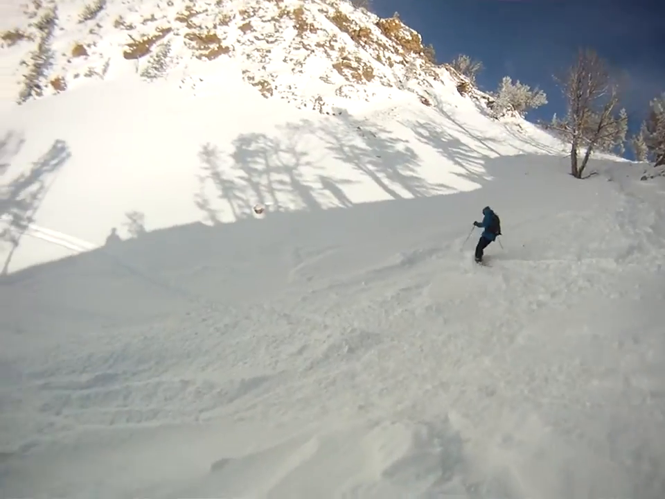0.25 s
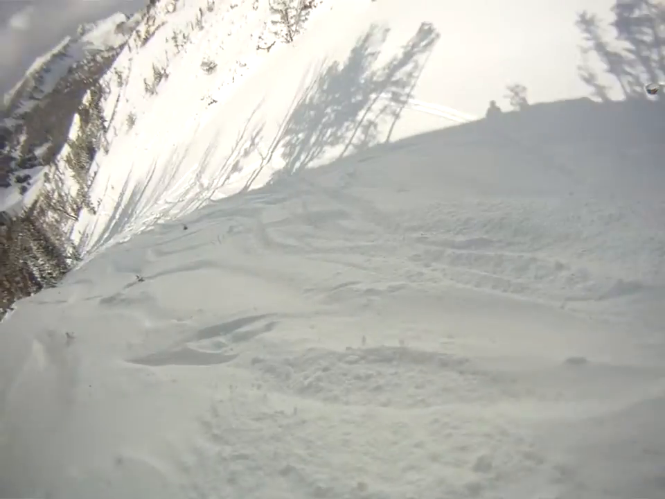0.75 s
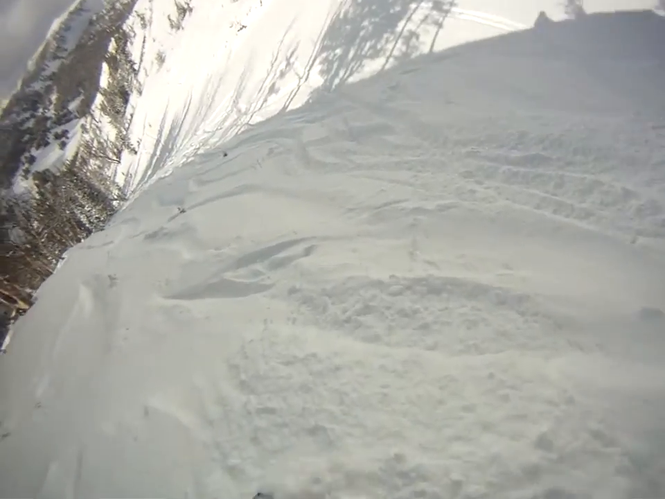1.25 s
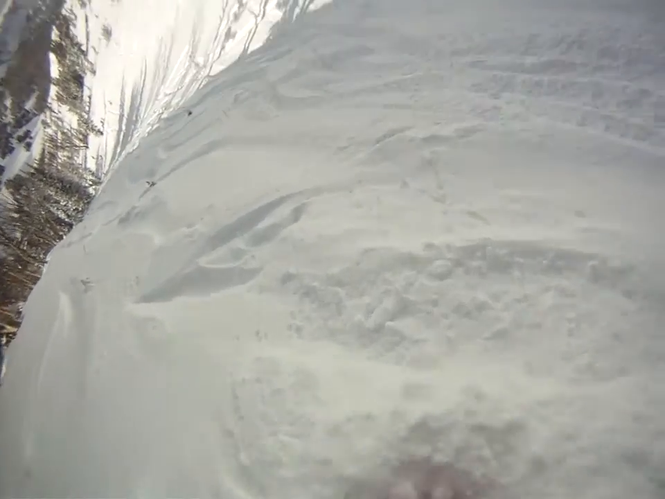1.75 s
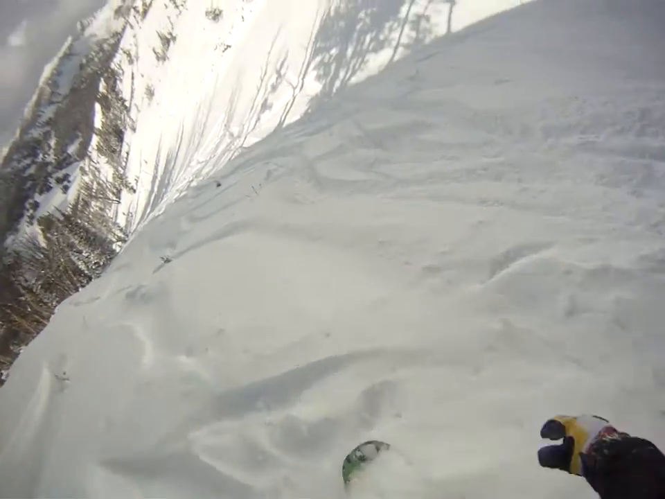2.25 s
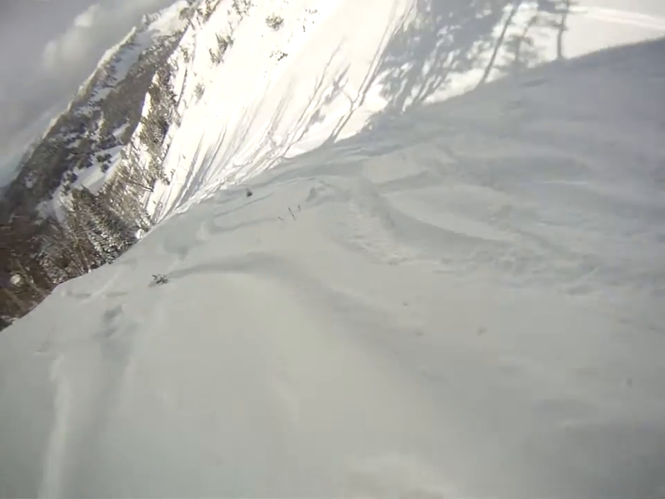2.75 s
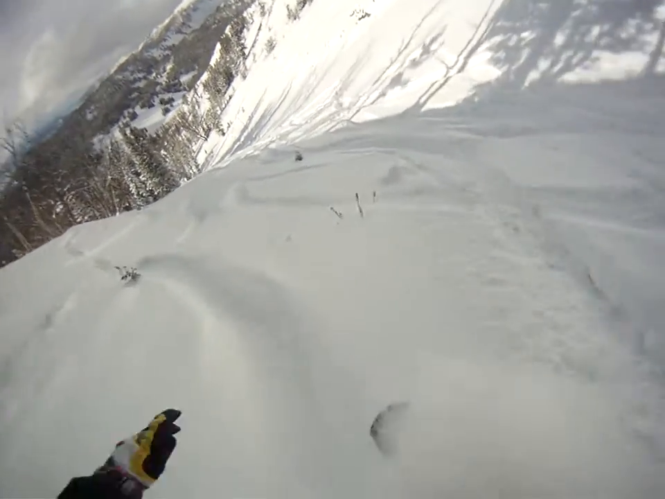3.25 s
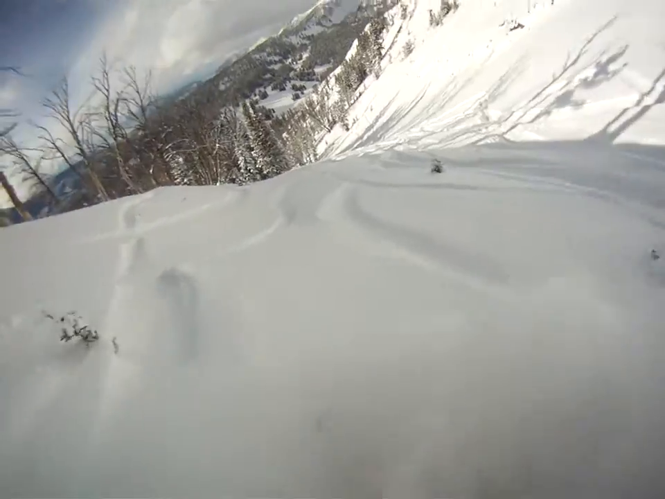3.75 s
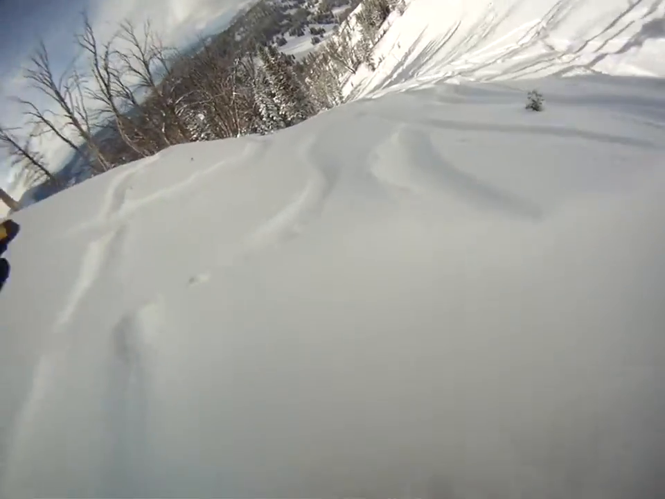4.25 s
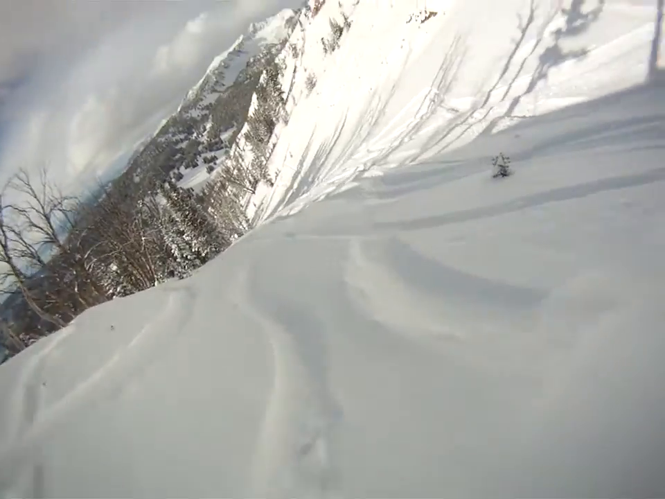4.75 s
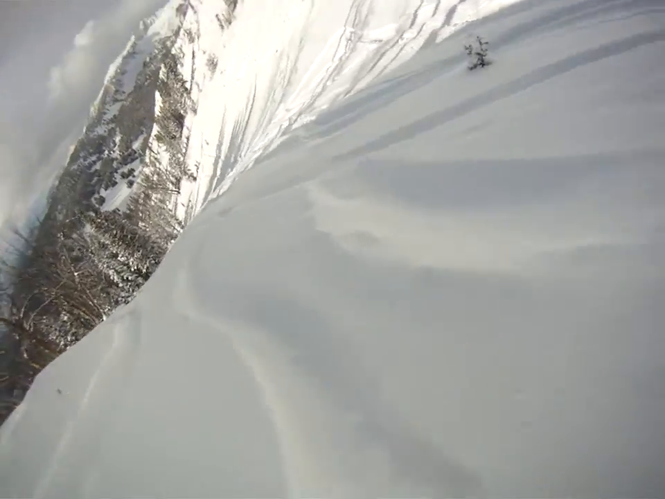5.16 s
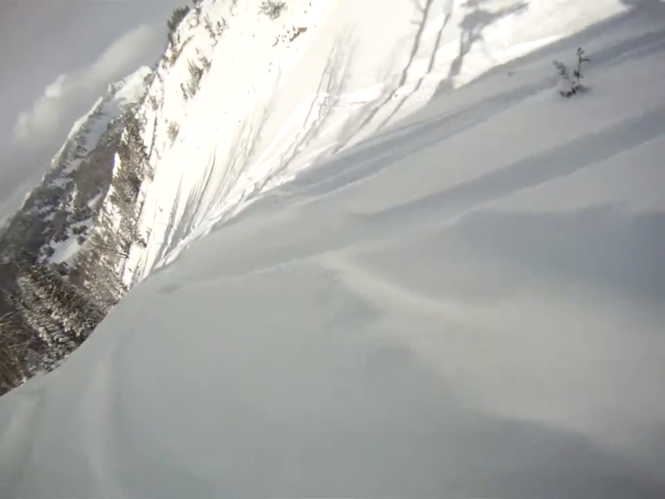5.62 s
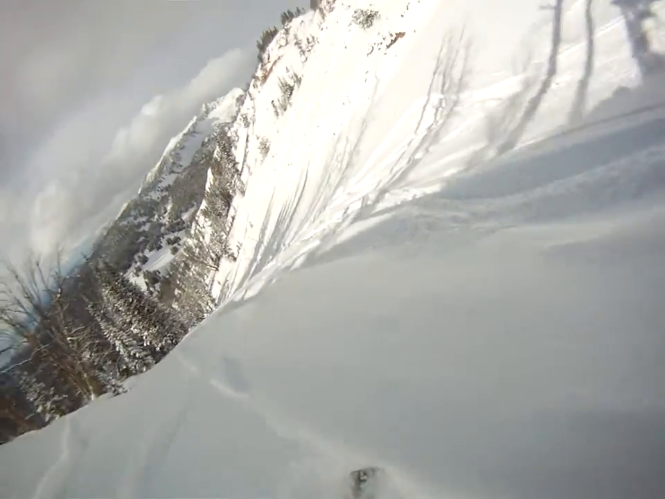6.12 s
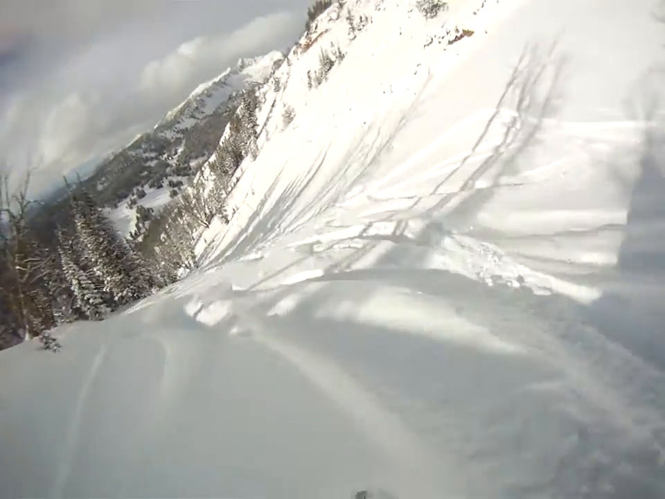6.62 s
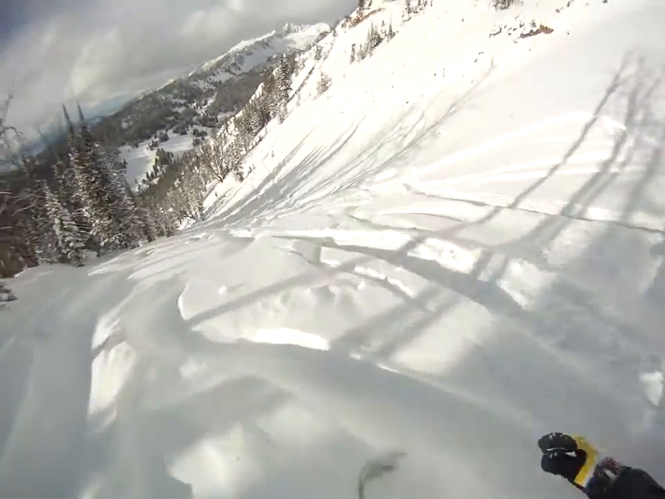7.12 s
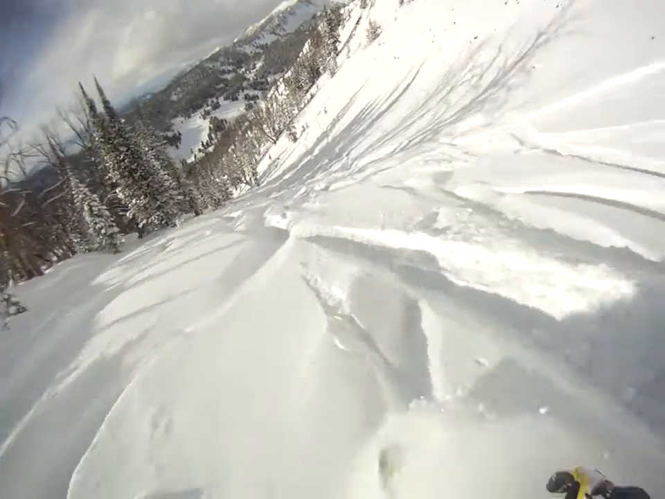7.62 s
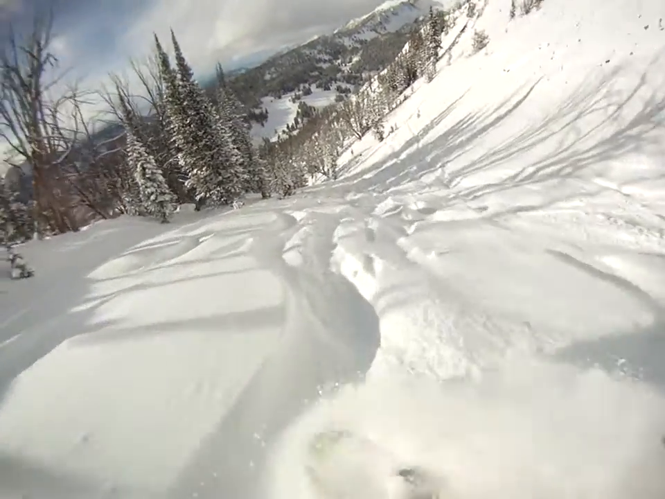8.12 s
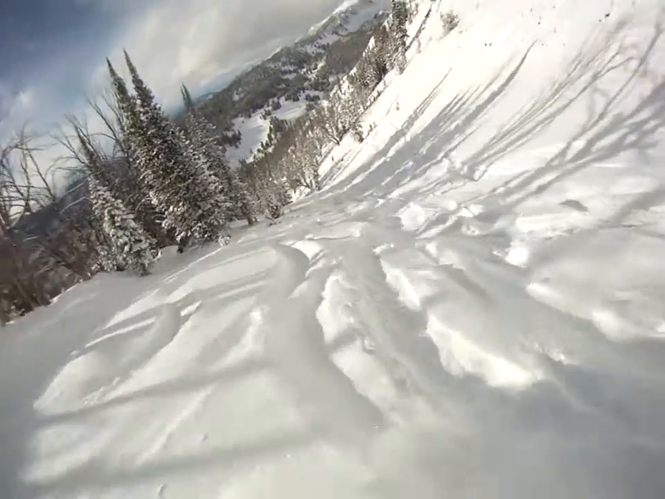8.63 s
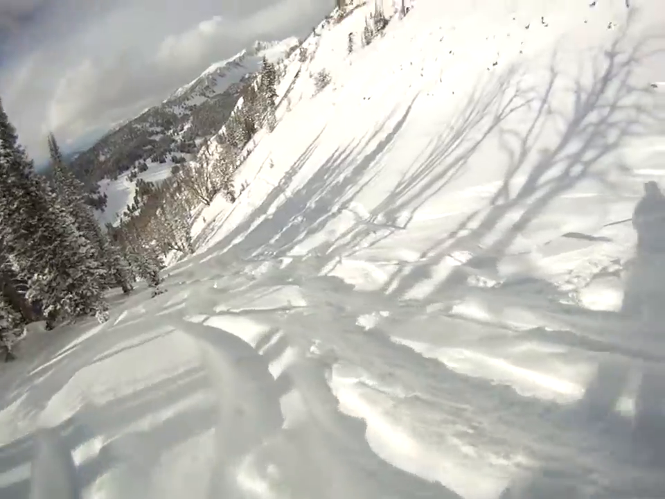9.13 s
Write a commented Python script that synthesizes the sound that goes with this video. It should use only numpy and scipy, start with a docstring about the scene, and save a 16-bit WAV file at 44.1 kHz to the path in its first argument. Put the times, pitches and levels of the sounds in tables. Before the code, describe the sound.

Wind buffets the microphone as a skier carves powder snow, each turn a rushing hiss, amid fabric rustle and small clicks.

```python
"""A low headwind rumbles on a body-worn camera, then the sound of skiing in deep powder cuts in abruptly.
The skis push up a rushing hiss that swells with each turn and once scrape over something firm.
Stiff clothing rustles, gear rattles and ticks, bumps shake the camera and snow clumps pat on its case.
The camera samples at a low rate, which mirrors the sound into a thin, fizzy treble."""
import sys
import numpy as np
from scipy import signal
from scipy.fft import rfft, irfft, next_fast_len
from scipy.io import wavfile
from scipy.ndimage import uniform_filter1d, map_coordinates

SR = 44100
rng = np.random.default_rng(int(sys.argv[2]) if len(sys.argv) > 2 else 0)


def master_out(mix):
    """Clip the mix to full scale and print it as 16-bit PCM to the path in sys.argv[1]."""
    frames = np.transpose(np.atleast_2d(mix))
    ceiling = np.clip(frames, -1, 1)
    pcm = np.round(ceiling * 32767).astype(np.int16)
    wavfile.write(sys.argv[1], SR, pcm)


N = 413658
TIME_S = np.arange(N) / SR


def amp(db):
    """Decibels to gain."""
    return 10 ** (np.asarray(db) / 20)


def unit(x):
    """Scale to rms 1."""
    return x / np.sqrt(np.mean(x ** 2) + 1e-20)


def wobble(rate_hz):
    """Smooth random curve, rate_hz knots a second."""
    knots = rng.standard_normal(int(N * rate_hz / SR) + 4)
    return map_coordinates(knots, [TIME_S * rate_hz])


def shape(points):
    """Gain against frequency from (freq_hz, level_db) points on a log axis."""
    freq_hz, level_db = np.transpose(points)
    return lambda hz: amp(np.interp(np.log(hz + 1), np.log(freq_hz), level_db))


def resonances(modes):
    """Gain against frequency from (centre_hz, width_hz, level_db) modes."""
    return lambda hz: np.sqrt(sum(
        np.abs(amp(db) * hz * width / (centre ** 2 - hz ** 2 + 1j * hz * width)) ** 2
        for centre, width, db in modes))


def coloured(x, gain):
    """Minimum-phase filter with the given gain against frequency."""
    size = 2 * next_fast_len(N // 2 + SR // 4)
    magnitude = np.maximum(gain(np.fft.rfftfreq(size, 1 / SR)), 1e-6)
    cepstrum = irfft(np.log(magnitude), size)
    cepstrum[1:size // 2] *= 2
    cepstrum[size // 2 + 1:] = 0
    return irfft(rfft(x, size) * np.exp(rfft(cepstrum)), size)[:N]


def noise(spectrum):
    """Coloured noise, rms 1."""
    return unit(coloured(rng.standard_normal(N), shape(spectrum)))


def grains(per_s, spread_db):
    """Random impulses, a few much larger than the rest; rms 1."""
    sizes = amp(spread_db * np.minimum(rng.exponential(size=N), 4))
    return unit((rng.random(N) < per_s / SR) * sizes * rng.choice([-1, 1], N))


def strike(t, rise_s, t60_s):
    """Envelope: quick rise, exponential decay."""
    return (1 - np.exp(-t / rise_s)) * amp(-60 * t / t60_s)


def add(track, start_s, sound):
    """Mix a sound into the track."""
    part = track[round(start_s * SR):][:len(sound)]
    part += sound[:len(part)]


def swell_power(rows, column=1, roundness=1.34, drop_db=11):
    """Power of swells, drop_db down at half_length_s from peak_s; column selects the level."""
    power = np.zeros(N)
    for row in rows:
        peak_s, level_db, half_length_s = row[0], row[column], row[2]
        away = np.abs(TIME_S - peak_s) / half_length_s
        near = away < 4
        power[near] += amp(level_db - drop_db * away[near] ** roundness) ** 2
    return power


def cut_in(start_s=0.48, rise_s=0.03):
    """0 before the skiing sound cuts in, 1 after."""
    return np.clip((TIME_S - start_s) / rise_s, 0, 1)


# Speed of the run, as headwind strength: time_s, level_db
HEADWIND = [(0.0, -75.5), (0.68, -63.5), (2.27, -65), (2.3, -60.5), (3.29, -54), (4.75, -61), (5.56, -57),
            (5.64, -55.5), (5.9, -59.5), (6.16, -55), (6.45, -61.5), (7.13, -55), (7.21, -58.5),
            (8.15, -56), (8.8, -61.5), (8.93, -59), (9.3, -61.5), (9.38, -58)]


def speed_power(cruise_db, db_per_db, cruise_headwind_db=-59):
    """Power of a sound that is cruise_db at cruising speed and grows with the headwind."""
    headwind_db = np.interp(TIME_S, *np.transpose(HEADWIND))
    return amp(cruise_db + db_per_db * (headwind_db - cruise_headwind_db)) ** 2


def eddies(spectrum):
    """Low turbulence of even strength."""
    flow = noise(spectrum)
    local_power = np.abs(uniform_filter1d(flow ** 2, size=SR // 7))
    return unit(flow / np.sqrt(local_power + 0.05))


# Wind spectra: freq_hz, density_db
LARGE_EDDY_SPECTRUM = [(4, -24.5), (12, 0.5), (24, -3), (37, -1), (48, -4.5), (60, -17), (100, -49.5)]
SMALL_EDDY_SPECTRUM = [(35, -25), (52, -2.5), (63, 1.5), (80, -5.5), (105, -12.5), (150, -23.5), (400, -65)]
RUSH_SPECTRUM = [(40, -14.5), (90, 2.5), (130, 2.5), (200, -5), (320, -10.5), (600, -21), (1500, -24),
                 (6000, -61)]
AIR_SPECTRUM = [(100, 2), (450, -2), (800, -4.5), (2000, -7), (4500, -11.5), (6000, -12.5)]
# Gusts on the case: peak_s, large_eddy_db, half_length_s, small_eddy_db, rush_db
WIND_GUSTS = [(0.68, -51, 0.089, -50, -65), (1.02, -49, 0.19, -51, -70), (1.38, -46.5, 0.08, -53, -70),
              (1.65, -43.5, 0.07, -55, -69), (2.15, -43, 0.47, -54.5, -75), (2.6, -38, 0.2, -55, -62),
              (2.98, -40, 0.28, -48, -62), (3.6, -37.5, 0.39, -46.5, -60), (4.07, -38, 0.3, -51, -63),
              (4.55, -44, 0.17, -53, -68), (4.96, -44.5, 0.12, -50.5, -64), (5.37, -41, 0.41, -51.5, -66),
              (5.65, -54, 0.12, -54, -54), (6.3, -45.5, 0.2, -63, -64), (7.15, -43.5, 0.21, -48.5, -62),
              (7.7, -39, 0.23, -51, -62), (8.1, -48, 0.064, -50, -58), (8.37, -42, 0.21, -50, -61),
              (9.27, -48, 0.1, -53, -68)]


def wind():
    """Large eddies thump the case, small ones flutter and rush past it, over a faint even hiss."""
    large = np.sqrt(speed_power(cruise_db=-51, db_per_db=0.7) + swell_power(WIND_GUSTS))
    small = np.sqrt(speed_power(cruise_db=-55, db_per_db=0.88) + swell_power(WIND_GUSTS, column=3))
    stream = np.sqrt(speed_power(cruise_db=-61, db_per_db=1.24) + swell_power(WIND_GUSTS, column=4))
    thumps = eddies(LARGE_EDDY_SPECTRUM) * large * amp(2.2 * wobble(9))
    flutter = eddies(SMALL_EDDY_SPECTRUM) * small * amp(1.8 * wobble(14))
    rush = noise(RUSH_SPECTRUM) * stream * amp(1.2 * wobble(20))
    return thumps + flutter + rush + amp(-63) * noise(AIR_SPECTRUM)


# Snow spectra: freq_hz, density_db
HISS_SPECTRUM = [(400, -21), (750, -20.5), (1000, -10.5), (1250, -0.3), (1500, -0.5), (1700, 3),
                 (2000, -5.5), (2400, -0.5), (2800, -5.5), (3300, -6.5), (4300, -20.5), (5100, -14),
                 (6500, -31), (9000, -52.5)]
CRUNCH_SPECTRUM = [(200, -8.5), (450, -9.5), (650, -23), (820, 2), (1000, -9), (1600, -12), (4000, -43)]
# Skis pressing into deeper snow: peak_s, hiss_db, half_length_s, crunch_db, hollow_db
SKI_SURGES = [(0.62, -62, 0.04, -68, -72), (3.1, -46, 0.063, -74, -66), (3.29, -45.5, 0.031, -74, -60),
              (3.425, -42, 0.059, -71, -61), (3.61, -49, 0.15, -64, -60), (3.86, -54, 0.059, -60, -66),
              (4.17, -50.5, 0.072, -75, -53.5), (5.19, -50, 0.028, -80, -66), (6.19, -44, 0.11, -54.5, -68),
              (6.63, -58, 0.11, -77, -74), (6.96, -46, 0.094, -74, -61), (7.26, -52, 0.07, -78, -55),
              (7.66, -44, 0.066, -59.5, -60), (7.96, -49, 0.11, -80, -68), (8.13, -55, 0.062, -80, -54),
              (8.31, -57, 0.08, -78, -51.5)]
# Skis set on edge: start_s, hold_s, hiss_db, hollow_db
SKI_TURNS = [(2.42, 0.08, -59, -67), (2.508, 0.42, -48.5, -64), (3.057, 0.59, -47.5, -69),
             (3.783, 0.06, -58, -74), (4.895, 0.23, -54, -58.5), (5.39, 0.27, -52.5, -71),
             (6.013, 0.29, -53.5, -65), (6.815, 0.44, -52.5, -65), (7.52, 0.15, -52.5, -54.5),
             (7.84, 0.46, -52.5, -63)]


def skis(bite_db_per_s=294, release_db_per_s=68, chatter_db=3):
    """Crystals shear under the skis; load adds a low crunch, sweeping snow a hollow note."""
    turn_hiss, turn_hollow = np.zeros(N), np.zeros(N)
    for start_s, hold_s, hiss_db, hollow_db in SKI_TURNS:
        before_s = np.maximum(start_s - TIME_S, 0)
        after_s = np.maximum(TIME_S - start_s - hold_s, 0)
        edging = amp(-bite_db_per_s * before_s - release_db_per_s * after_s)
        turn_hiss += (amp(hiss_db) * edging) ** 2
        turn_hollow += (amp(hollow_db) * edging) ** 2
    chatter = amp(chatter_db * wobble(20))  # flat skis on uneven snow
    glide = cut_in() * speed_power(cruise_db=-60, db_per_db=0.99) * chatter ** 2
    carve = np.sqrt(glide + turn_hiss + swell_power(SKI_SURGES))
    load = np.sqrt(swell_power(SKI_SURGES, column=3))
    sweep = np.sqrt(turn_hollow + swell_power(SKI_SURGES, column=4))
    crystals = unit(rng.standard_normal(N) + 0.74 * grains(per_s=3000, spread_db=3.5))
    flicker = amp(-0.6 + 0.7 * wobble(22) + 1.1 * wobble(130))
    hiss = unit(coloured(crystals, shape(HISS_SPECTRUM))) * carve * flicker
    hollow_band = resonances([(1290, 300, 0)])
    hollow = unit(coloured(rng.standard_normal(N), lambda hz: hollow_band(hz) ** 2))
    crunch = noise(CRUNCH_SPECTRUM) * load * amp(1.2 * wobble(25))
    return hiss + crunch + hollow * sweep * amp(1.2 * wobble(40))


# Stiff fabric: freq_hz, density_db
FABRIC_SPECTRUM = [(400, -27.5), (750, -20), (1250, -6), (1600, -9), (2000, 0.5), (2400, -10), (2900, -11),
                   (3450, -10.5), (4300, -19.5), (5100, -17), (6500, -24.5), (9000, -49.5)]
# Rubs as the skier moves: peak_s, level_db, half_length_s
CLOTHING_RUBS = [(0.502, -49.5, 0.027), (0.607, -44, 0.057), (0.68, -53.5, 0.05), (0.8, -60, 0.028),
                 (0.98, -59.5, 0.1), (1.25, -54, 0.047), (1.292, -49.5, 0.019), (1.42, -58, 0.05),
                 (1.66, -61.5, 0.06), (1.775, -53.5, 0.036), (1.835, -53.5, 0.028), (1.93, -57, 0.033),
                 (2.62, -42.5, 0.021), (2.668, -44.5, 0.016), (2.725, -50, 0.021), (3.25, -51, 0.11),
                 (3.45, -46.5, 0.091), (3.625, -46, 0.046), (3.81, -48.5, 0.097), (3.965, -50, 0.035),
                 (4.28, -49, 0.023), (4.48, -52, 0.035), (4.68, -54, 0.096), (4.918, -45.5, 0.04),
                 (4.99, -50.5, 0.044), (5.5, -48, 0.13), (6.045, -48.5, 0.022), (6.165, -44, 0.081),
                 (7.672, -44.5, 0.027), (8.89, -54, 0.04), (9.21, -53, 0.038)]


def clothing():
    """The weave catches and slips: light, fitful flapping and an abrupt rub with each move."""
    flapping = cut_in() * speed_power(cruise_db=-65, db_per_db=0.35) * amp(1.5 * wobble(25)) ** 2
    motion = np.sqrt(flapping + swell_power(CLOTHING_RUBS, roundness=2.73))
    weave = 0.69 * rng.standard_normal(N) + grains(per_s=1800, spread_db=3.5)
    clumping = amp(0.63 * wobble(60) + 1.74 * wobble(240))
    return unit(coloured(weave * clumping, shape(FABRIC_SPECTRUM))) * motion


# Hollow plastic of the gear: centre_hz, width_hz, level_db
PLASTIC_MODES = [(1320, 160, -16), (2010, 120, -6.5), (3220, 200, -38)]


def gear_rattle(level_db=-66, knocks_per_s=14, t60_s=0.063):
    """Loose gear jiggles through the run; faint random knocks ring its plastic."""
    knocks = (rng.random(N) < knocks_per_s / SR) * amp(rng.uniform(-6, 0, N)) ** 2
    decay = amp(-60 * TIME_S[:SR // 10] / t60_s)
    power = np.abs(signal.fftconvolve(knocks, decay ** 2)[:N])
    bursts = rng.standard_normal(N) * np.sqrt(power)
    return unit(coloured(bursts, resonances(PLASTIC_MODES))) * cut_in() * amp(level_db)


# Bumps: start_s, relative_db, pitch_hz
CAMERA_JOLTS = [(0.656, -35, 65), (0.784, -26, 64), (1.628, -30.5, 68.3), (3.062, -27.5, 71)]


def camera_jolts():
    """Bumps swing the camera on its mount for two or three cycles."""
    track, t = np.zeros(N), TIME_S[:SR // 5]
    for start_s, relative_db, pitch_hz in CAMERA_JOLTS:
        envelope = amp(relative_db - 0.5) * strike(t, rise_s=0.011, t60_s=0.13)
        add(track, start_s, envelope * np.sin(2 * np.pi * pitch_hz * t))
    return track


# Gear shifting: start_s, relative_db, crack_offset_db
GEAR_TICKS = [(0.723, -43.5, -14), (0.9901, -43, -17), (1.183, -39, -20), (1.2196, -48, -10),
              (1.535, -48, -10), (1.601, -45, -12), (1.8795, -48.5, 3.5), (1.9155, -42, -18),
              (1.943, -45, -20), (2.0892, -43, -17), (2.256, -45.5, -8), (3.1818, -33, -10),
              (3.962, -36, -6), (4.3202, -35, 5.5), (4.495, -37.5, -5), (4.6403, -37.5, -14),
              (4.7996, -49.5, 4), (4.882, -46, 7.5), (4.9397, -34, -3), (5.0729, -40.5, -9),
              (5.3336, -38, -15), (6.003, -39, -6), (6.342, -39, -10), (6.3639, -38, -3), (7.0118, -37, -6),
              (8.9026, -54, -16), (9.005, -42, -14), (9.1006, -48, 5.5), (9.176, -42.5, 0),
              (9.225, -39, -15)]


def gear_ticks():
    """Each shift of the gear is a small crack and a brief rub that rings the plastic."""
    rings, cracks, t = np.zeros(N), np.zeros(N), TIME_S[:SR // 20]
    plastic = coloured(rng.standard_normal(N), resonances(PLASTIC_MODES))
    for start_s, relative_db, crack_offset_db in GEAR_TICKS:
        rub = strike(t, rise_s=0.0025, t60_s=0.04) * plastic[round(start_s * SR):][:len(t)]
        add(rings, start_s, amp(relative_db - 16.5) * unit(rub))
        crack = strike(t, rise_s=0.00032, t60_s=0.022) * rng.standard_normal(len(t))
        add(cracks, start_s, amp(relative_db + crack_offset_db - 1) * crack)
    bright = shape([(400, -36), (1200, -16), (3300, 12.5), (4300, -4), (6000, -6)])
    return rings + coloured(cracks, bright)


# Ski edge resonances: centre_hz, width_hz, level_db
EDGE_MODES = [(2200, 640, 5.5), (2950, 960, -4), (3400, 150, 4.5), (3950, 310, -1), (4500, 250, -19),
              (5070, 300, -2)]
# Edge on something firm under the powder: peak_s, level_db, half_length_s
EDGE_SCRAPES = [(4.2, -54.5, 0.1), (4.335, -40.5, 0.029), (4.42, -55, 0.088)]


def edge_scrape():
    """The edge catches and slips in rough bursts that excite its resonances."""
    slips = 0.5 * rng.standard_normal(N) + grains(per_s=2800, spread_db=1.5)
    roughness = amp(1.2 * wobble(240))
    contact = np.sqrt(swell_power(EDGE_SCRAPES, roundness=1.6))
    return unit(coloured(slips * roughness, resonances(EDGE_MODES))) * contact


# Snow clumps on the case: start_s, relative_db
SNOW_PATS = [(4.772, -30.5), (5.460, -32), (6.173, -32), (6.226, -33), (8.905, -38)]


def snow_pats(t60_s=0.0096):
    """A clump bursts on the case: a dull tick with no ring."""
    track, t = np.zeros(N), TIME_S[:SR // 40]
    for start_s, relative_db in SNOW_PATS:
        envelope = amp(relative_db + 5 - 60 * t / t60_s)
        add(track, start_s, envelope * rng.standard_normal(len(t)))
    dull = shape([(400, -11), (1000, -0.5), (2200, 7), (4500, -18), (6000, -19)])
    return coloured(track, dull)


def scene():
    """All sources reach one microphone; both channels are alike."""
    mono = (skis() + edge_scrape() + clothing() + gear_ticks() + snow_pats() + camera_jolts()
            + wind() + gear_rattle())
    return np.array([mono, mono])


CAMERA_RATE_HZ, HOLD_REPEATS, CUTOFF_HZ = 12000, 4, 15400


def record(dry):
    """The camera holds each slow sample, mirroring the sound around its rate; each channel adds hiss."""
    anti_alias = shape([(5100, 0.5), (5500, -2.5), (6000, -9), (6600, -29.5)])
    slow = signal.resample_poly(coloured(dry.mean(axis=0), anti_alias), CAMERA_RATE_HZ, SR)
    steps = np.repeat(slow, HOLD_REPEATS)
    held = signal.resample_poly(steps, SR, HOLD_REPEATS * CAMERA_RATE_HZ)[:N]
    hiss_spectrum = [(40, -26), (200, 3), (650, 5), (2000, -29), (4400, -6.5), (7100, -18), (12000, -34)]
    stereo = held + amp(-79) * np.array([noise(hiss_spectrum), noise(hiss_spectrum)])
    size = next_fast_len(N + SR // 4)
    passband = np.fft.rfftfreq(size, 1 / SR) < CUTOFF_HZ
    return irfft(rfft(stereo, size) * passband, size)[:, :N]


dry = scene()
out = record(dry)
master_out(out)
```